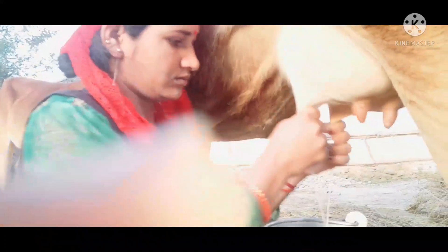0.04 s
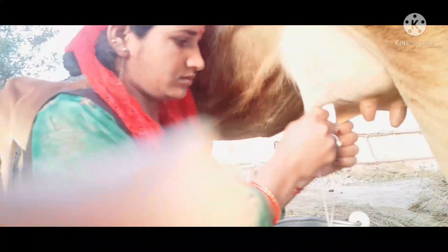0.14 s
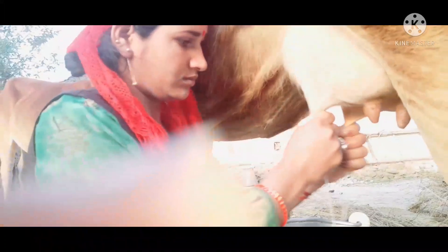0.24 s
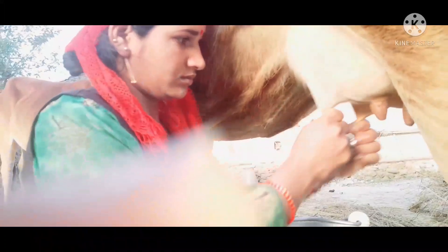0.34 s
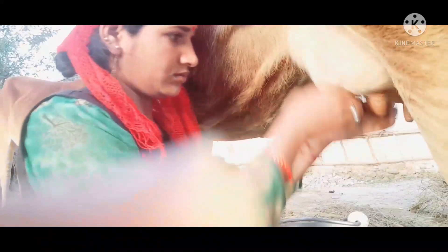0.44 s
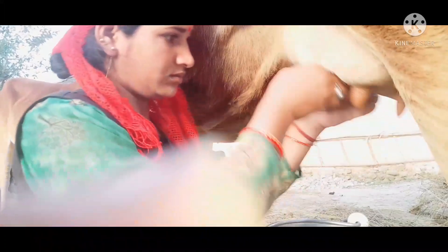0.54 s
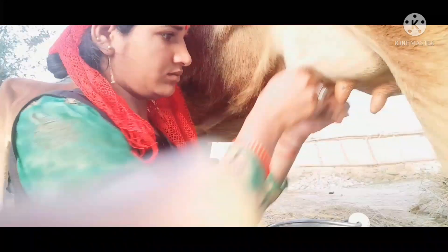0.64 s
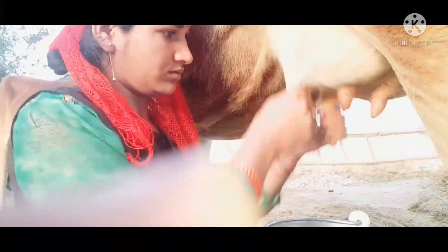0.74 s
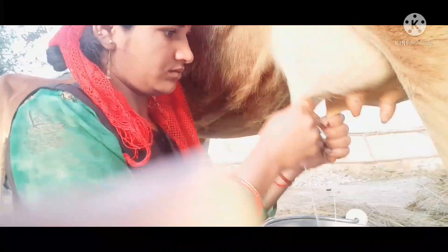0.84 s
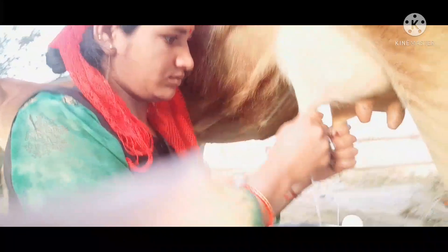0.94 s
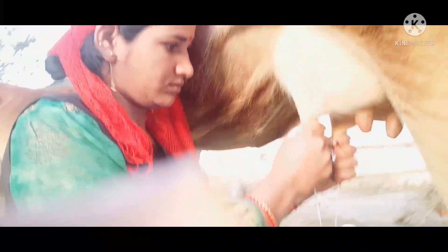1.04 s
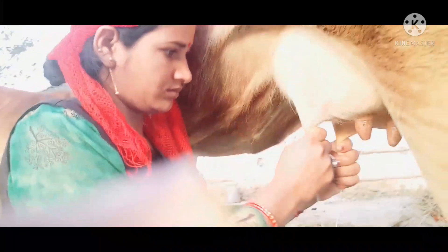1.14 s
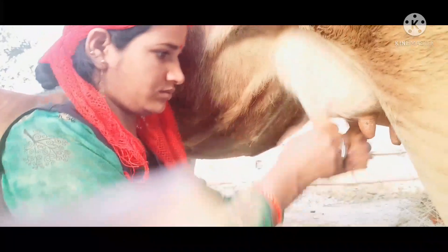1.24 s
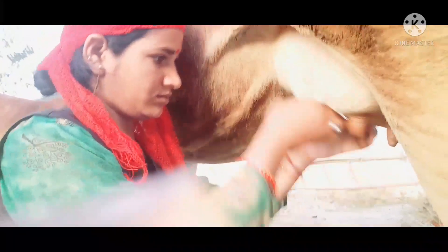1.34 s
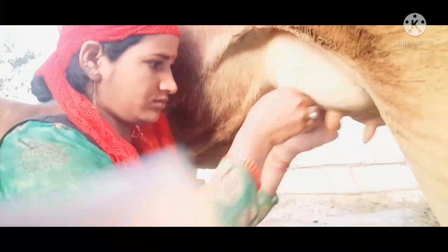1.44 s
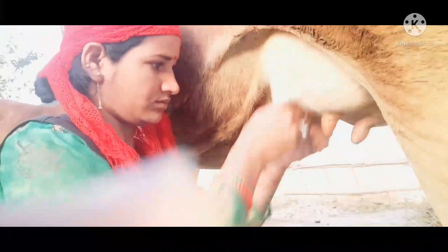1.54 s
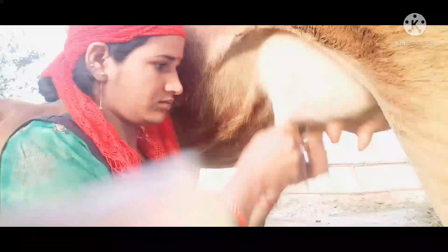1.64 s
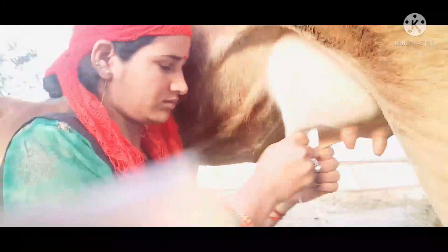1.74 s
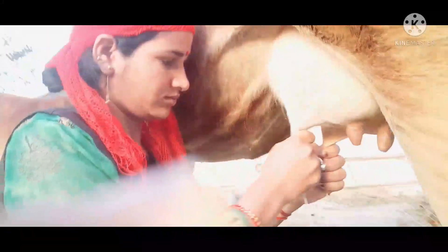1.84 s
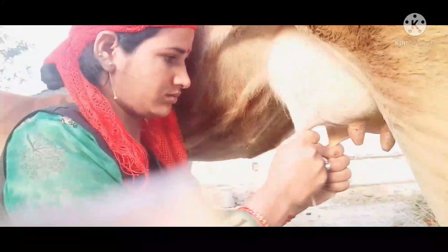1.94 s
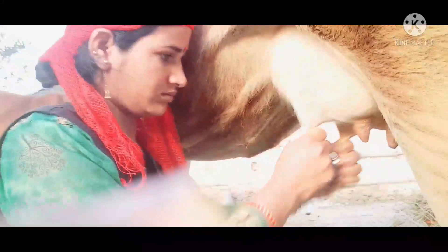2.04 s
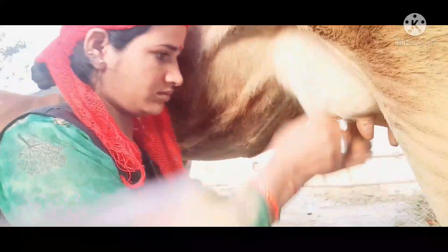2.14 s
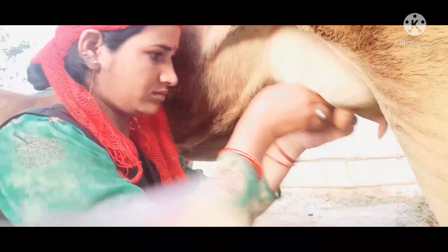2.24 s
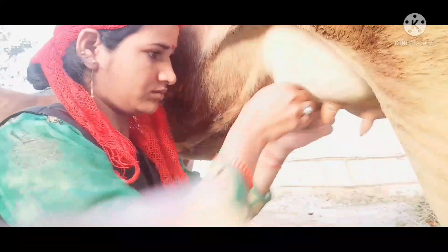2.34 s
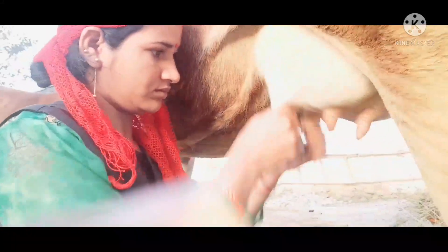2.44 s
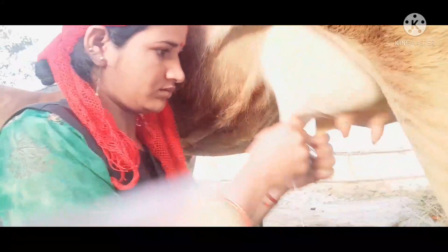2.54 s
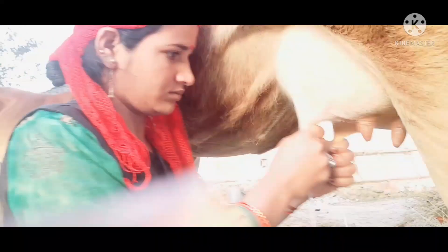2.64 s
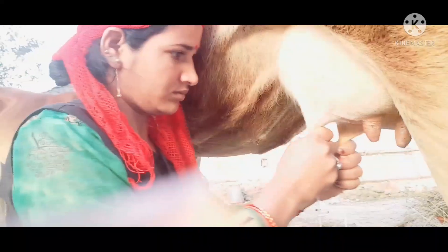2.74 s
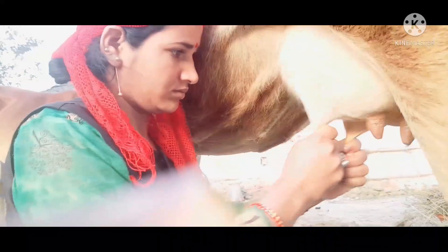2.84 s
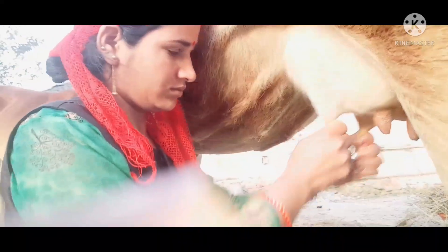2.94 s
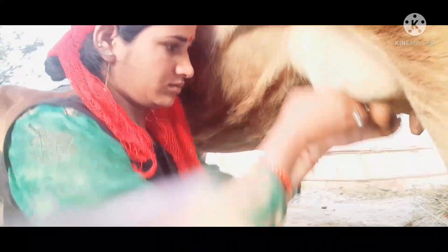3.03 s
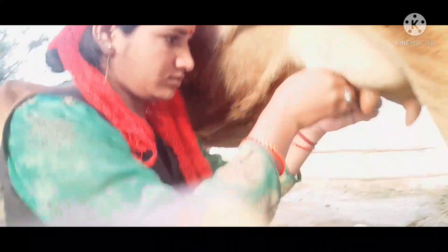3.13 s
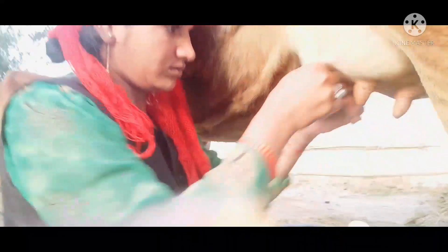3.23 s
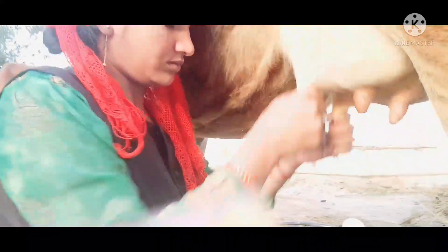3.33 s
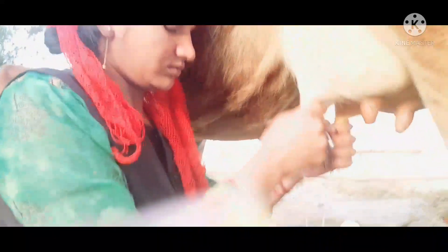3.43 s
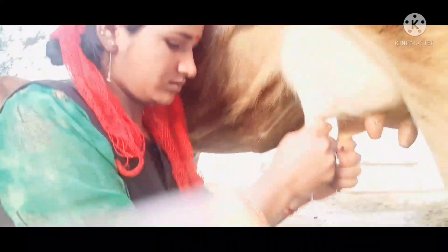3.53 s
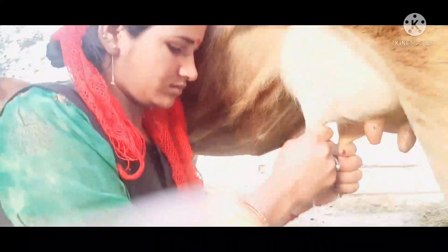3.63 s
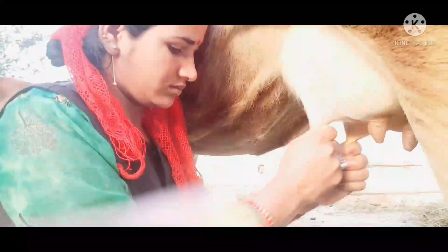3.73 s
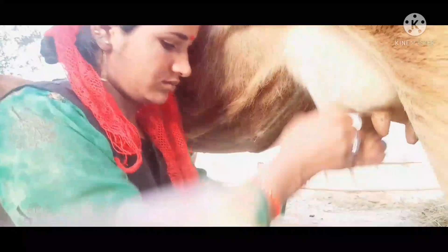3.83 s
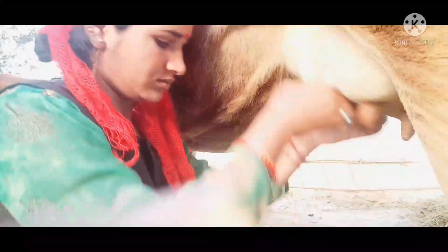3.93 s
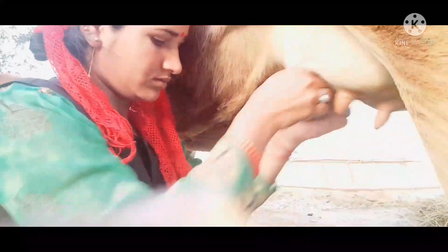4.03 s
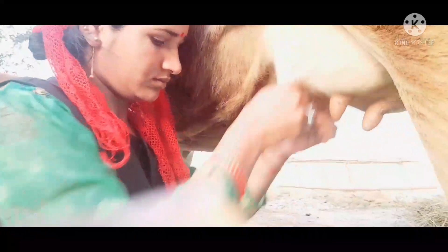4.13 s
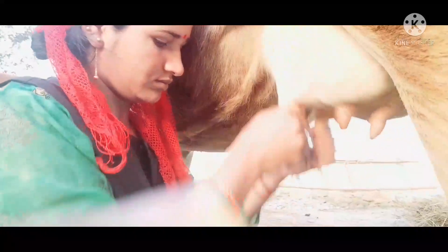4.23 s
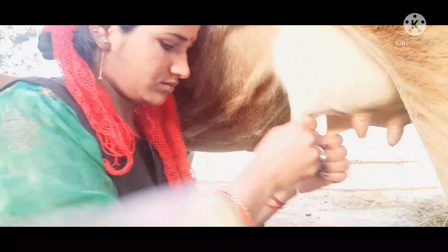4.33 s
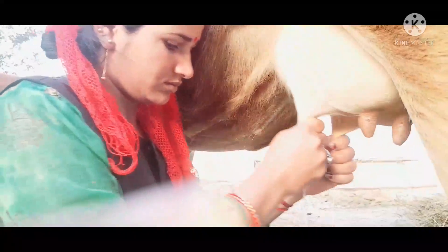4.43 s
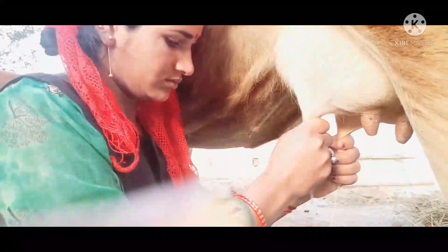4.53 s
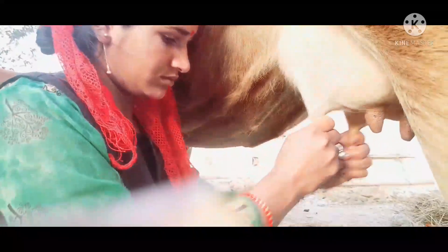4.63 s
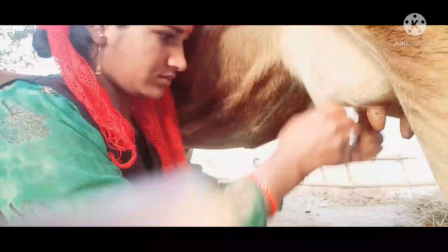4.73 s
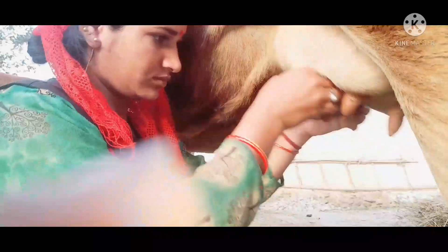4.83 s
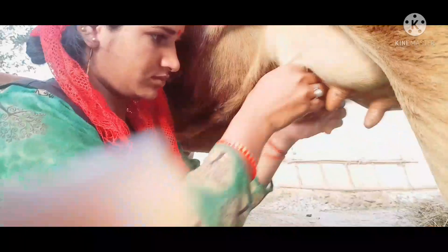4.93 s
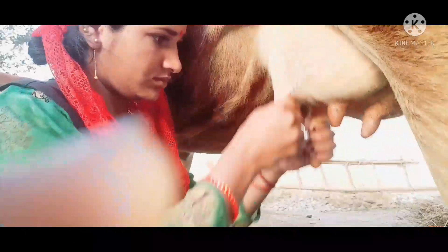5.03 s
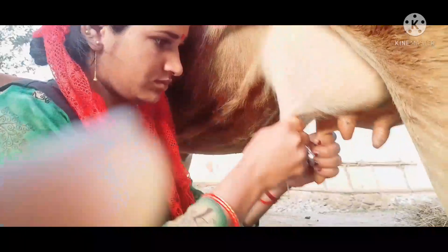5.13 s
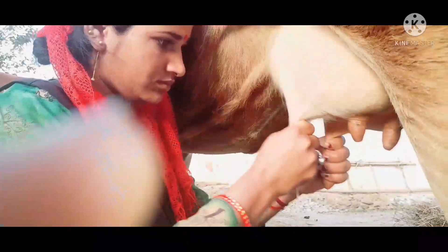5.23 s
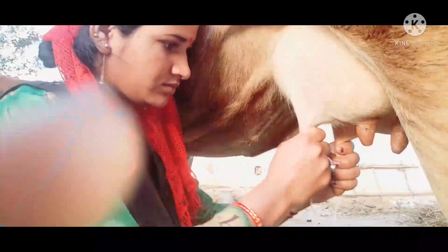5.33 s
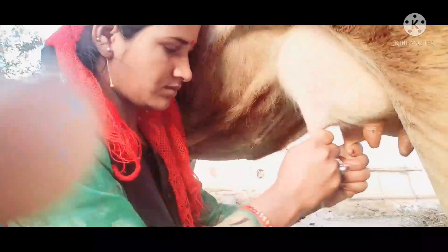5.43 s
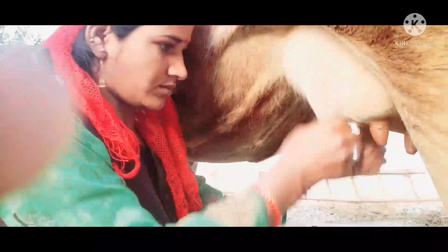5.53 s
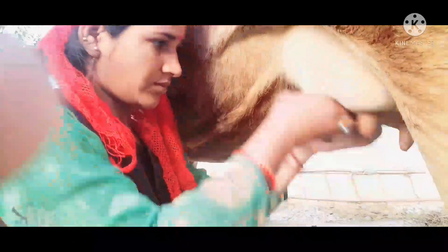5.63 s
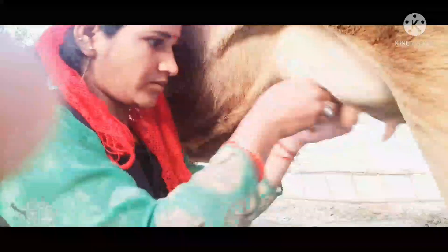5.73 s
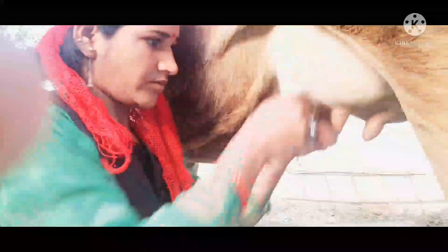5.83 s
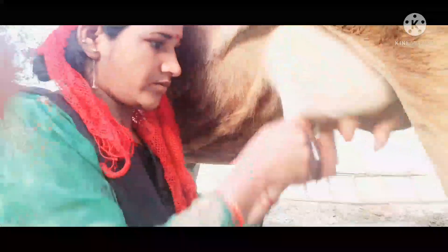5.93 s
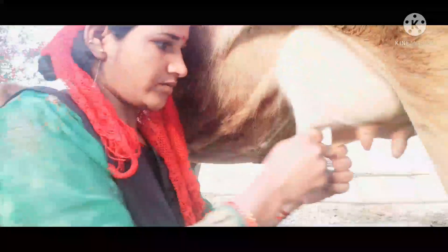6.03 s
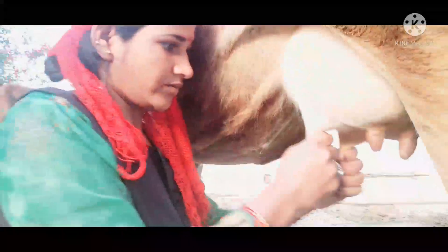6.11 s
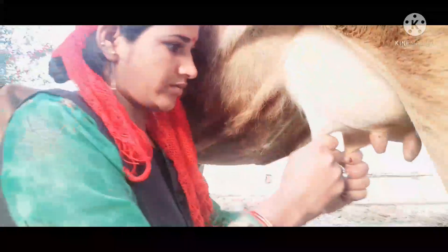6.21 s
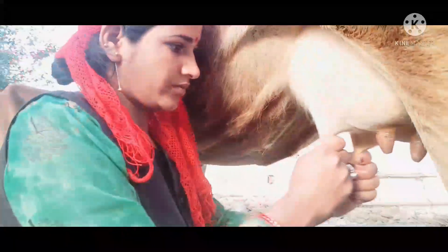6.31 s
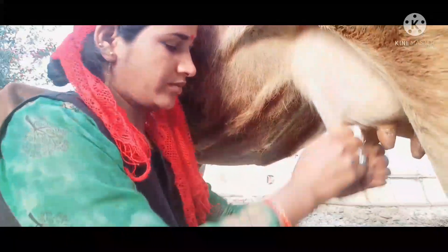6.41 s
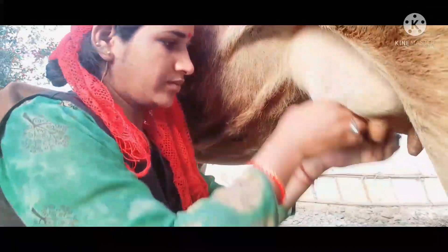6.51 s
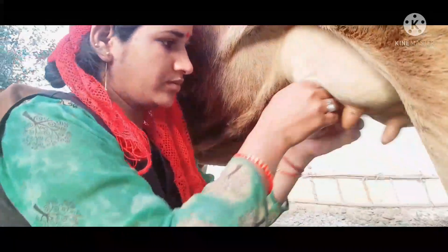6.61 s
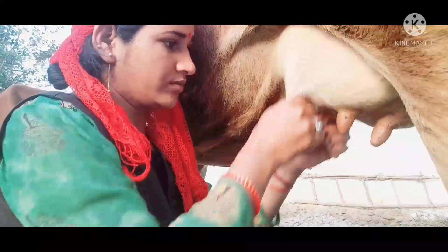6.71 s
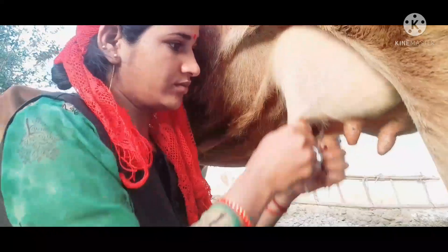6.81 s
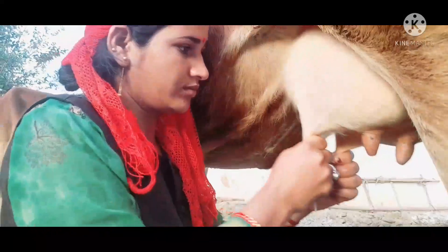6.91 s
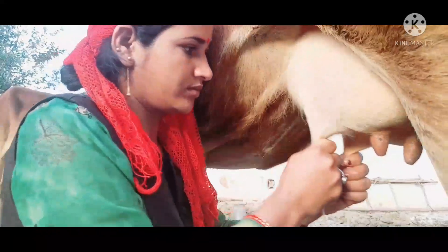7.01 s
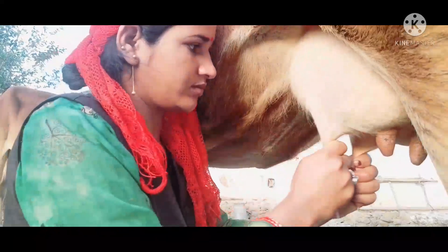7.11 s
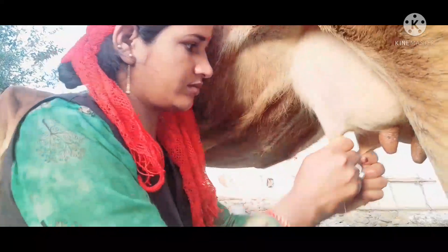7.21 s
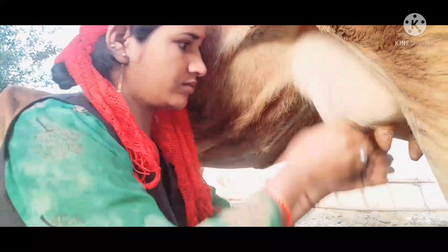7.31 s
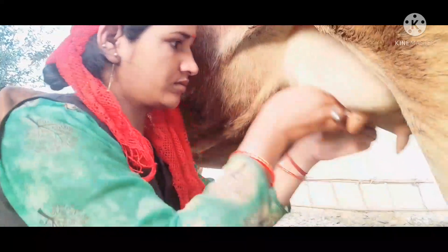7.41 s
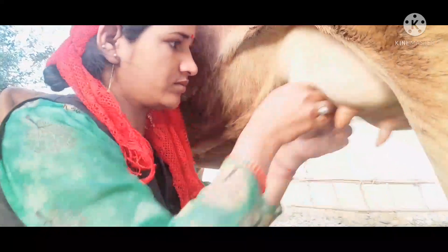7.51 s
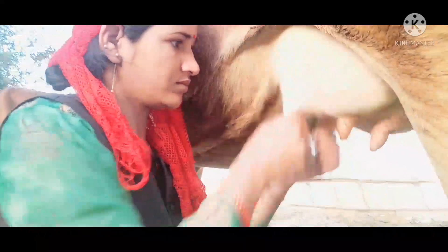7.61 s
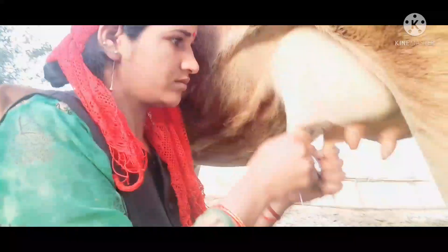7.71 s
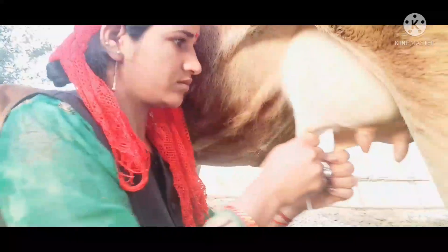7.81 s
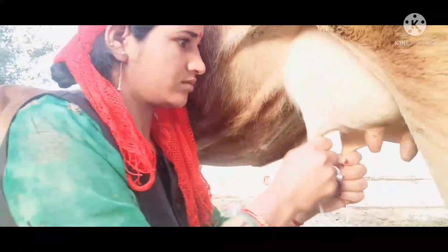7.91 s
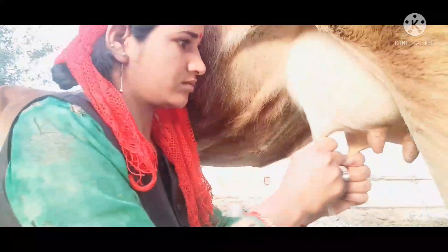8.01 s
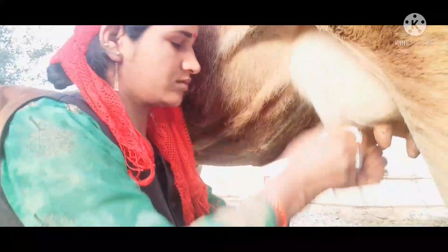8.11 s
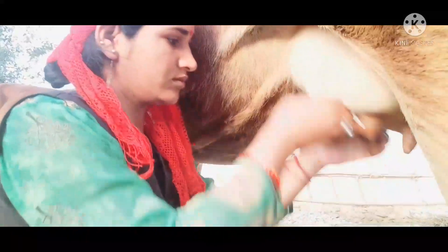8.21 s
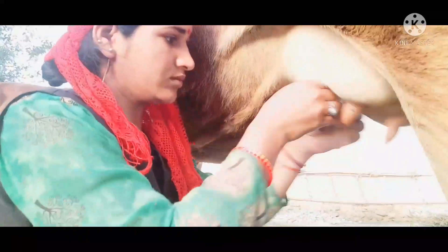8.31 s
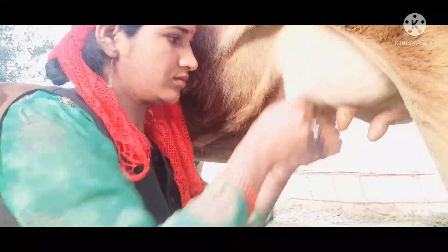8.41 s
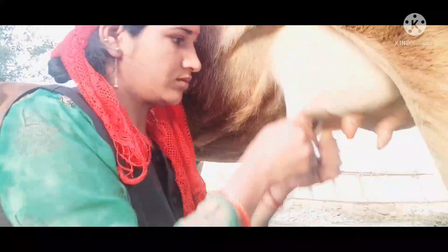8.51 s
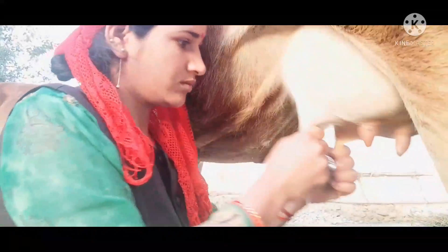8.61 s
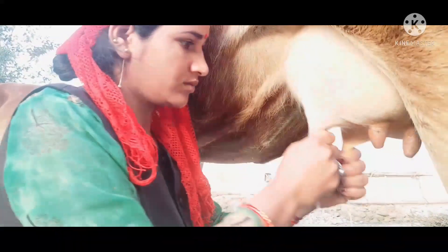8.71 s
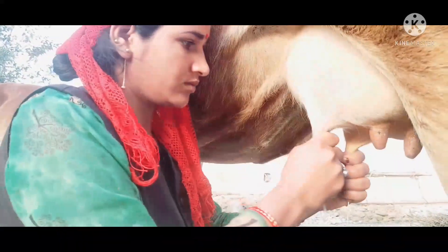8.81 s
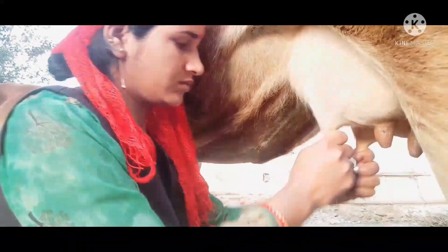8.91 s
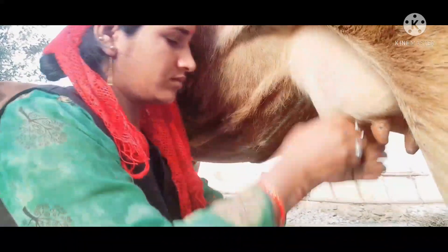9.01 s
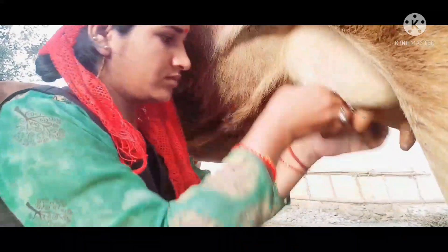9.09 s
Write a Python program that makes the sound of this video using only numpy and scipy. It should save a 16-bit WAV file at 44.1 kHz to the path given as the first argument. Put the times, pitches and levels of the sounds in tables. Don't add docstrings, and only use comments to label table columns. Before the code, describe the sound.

A cow is milked by hand into a metal vessel holding frothy milk, heard at arm's length in a walled yard. Strong squirts begin near 0.0, 0.9, 1.75, 2.6, 3.5, 4.3, 5.2, 6.0, 6.9, 7.8 and 8.65 seconds, each about 0.35 seconds: crisp spray hiss first, then fizzing, popping froth and a hollow low drone as the jet plunges. Sharp droplets crack on metal; drips, thin trickles and dull knocks fill the pauses, with a gulp around 6.6. The cow puffs softly, clearest at 0.9. From 1.4 to 6.5 a bird repeats a fast falling sweep and level whistle every 0.3 seconds; another answers with loud slides around 3.8 to 4.3. Fainter echoing chirps continue, sparse later. Quiet rumbling air and rustling leaves lie underneath, with a breeze bump at 6.3. Handheld stereo microphone, left side shaded.

```python
import sys
import numpy as np
from scipy import signal
from scipy.fft import rfft, irfft, next_fast_len
from scipy.io import wavfile
from scipy.ndimage import uniform_filter1d, map_coordinates

SR = 44100
rng = np.random.default_rng(int(sys.argv[2]) if len(sys.argv) > 2 else 0)


def int16_out(signal):
    q = np.round(np.clip(np.atleast_2d(signal).T, -1, 1) * 32767)
    wavfile.write(sys.argv[1], SR, q.astype(np.int16))


def boost(x):
    u = np.asarray(x, float) / 20
    return 10 ** u


N = 403515
TIME = np.arange(N) / SR


def unit(x):
    return x / np.sqrt(np.mean(x ** 2) + 1e-20)


def along(points, hz):
    f, v = np.transpose(points)
    return np.interp(np.log(hz + 1), np.log(f + 1), v)


def curves(rows):
    s, *cols = np.transpose(rows)
    return [np.interp(TIME, s, c) for c in cols]


def wobble(rate):
    return map_coordinates(rng.standard_normal(int(N * rate / SR) + 4), [TIME * rate])


def swells(rows):
    return sum(boost(2 * db) * np.exp(-2 * ((TIME - s) / length) ** 2) for s, length, db in rows)


def filtered(x, response):
    m = next_fast_len(N + SR // 2)
    return irfft(rfft(x, m) * response(np.fft.rfftfreq(m, 1 / SR)), m)[..., :N]


def band(x, lo_hz, hi_hz):
    return x / np.std(filtered(x, lambda hz: (hz > lo_hz) & (hz < hi_hz)))


def modes(table):
    def response(f):
        total = 0
        for k, (centre, width, db) in enumerate(table):
            damping = 1j * f * width
            total = total + (-1) ** k * boost(db) * damping / (centre * centre - f * f + damping)
        return total
    return response


def pair(alike, patchy_db, size=256):
    z = signal.stft(rng.standard_normal((2, N)), nperseg=size)[2]
    field = uniform_filter1d(rng.standard_normal(z.shape[1:]), size=5, axis=0)
    field = uniform_filter1d(field, size=5, axis=1)
    two = signal.istft(z * boost(patchy_db * unit(field)), nperseg=size)[1][:, :N]
    turn = lambda hz: np.arccos(np.clip(along(alike, hz), -1, 1)) / 2
    mid, side = filtered(two, lambda hz: np.array([np.cos(turn(hz)), np.sin(turn(hz))]))
    return unit(np.array([mid + side, mid - side]))


# f/Hz, level/dB per Hz
AIR_COLOUR = [(15, -41.5), (25, -8.5), (70, 3), (285, 0), (394, -17.5), (900, -17), (1600, -20),
              (2280, -10), (2610, -4.5), (4140, -5.5), (6210, -10), (8590, -15.5), (14000, -12.5),
              (16000, -57)]
# t/s, rumble level/dB, rustle level/dB
BREEZE_LEVELS = [(0, -79, -74), (.65, -76, -76.5), (1.5, -75.5, -74), (2.4, -73, -71.5), (3.2, -72, -72.5),
                 (4.1, -71.5, -68.5), (5, -73.5, -71.5), (5.8, -74, -74), (6.3, -59, -65.5),
                 (6.6, -65.5, -71.5), (7.5, -75.5, -72), (8.4, -77, -71.5), (9.15, -73.5, -66)]
# f/Hz, likeness/1
YARD_ALIKE = [(60, 0.5), (300, 0.7), (700, 0), (1500, 0.19), (15000, 0.28)]


def background():
    rumble_db, rustle_db = curves(BREEZE_LEVELS)
    air = filtered(pair(YARD_ALIKE, patchy_db=1.5), lambda hz: (hz < 14600) * boost(along(AIR_COLOUR, hz)))
    low = filtered(air, lambda hz: 1 / (1 + (hz / 300) ** 4))
    rumble = boost(rumble_db + 1.5 * wobble(6) + 2.5 * wobble(25)) * band(low, 30, 200)
    rustle = boost(rustle_db + 0.56 * wobble(17.0)) * band(air - low, 4150, 5800)
    return rumble + rustle


# f/Hz, 60 dB decay/s
WALL_DECAY = [(1500, 0.24), (3200, 0.39), (7000, 0.42)]


def yard(x, wet_db, gap_s, near_db):
    out, size = np.zeros((2, N + SR)), SR // 3
    for start in range(0, N, size):
        hz, t, z = signal.stft(rng.standard_normal((2, SR // 2)), SR, nperseg=256)
        far_walls = boost(-60 * t / along(WALL_DECAY, hz)[:, None])
        near_walls = boost(near_db - 60 * (t / 0.072) ** 2)
        tail = signal.istft(z * (far_walls + near_walls), SR, nperseg=256)[1]
        tail = np.pad(tail / np.linalg.norm(tail[0]), ((0, 0), (int(gap_s * SR), 0)))
        echo = signal.fftconvolve(x[None, start:start + size], tail, axes=1)
        out[:, start:start + echo.shape[1]] += echo
    return x * boost([[-5], [1.5]]) + boost(wet_db) * out[:, :N]


def sing(track, s, rows, db, factor=1, swell_db=0):
    when, hz, level = np.transpose(rows)
    t = np.arange(int(when[-1] * SR)) / SR
    phase = 2 * np.pi * factor * np.cumsum(np.interp(t, when, hz)) / SR
    edge = np.clip(np.minimum(t, t[-1] - t) / 0.0018, 0, 1)
    level = db + np.interp(t, when, level) + swell_db * (t - t[-1] / 2)
    track[round(s * SR):][:len(t)] += edge * boost(level) * np.sin(phase)


# t/s, length/s, first f/Hz, last f/Hz, level/dB
HIGH_DWELLERS = [
    (.523, 0.047, 2300, 2900, -60),
    (3.1, 0.027, 6500, 4700, -48),
    (3.772, 0.13, 6320, 3710, -32),
    (4.105, 0.04, 2850, 4050, -36.5),
    (4.206, 0.045, 3000, 4150, -37),
    (4.88, 0.07, 3860, 3900, -57),
    (6.488, 0.085, 5380, 4280, -42),
    (6.82, .03, 4200, 3780, -73),
    (4.824, 0.064, 1795, 1585, -64),
    (8.61, 0.015, 5300, 5940, -50),
]
# t/s, length/s, first f/Hz, last f/Hz, level/dB
EVEN_SLIDES = [(.5, 0.047, 4600, 4450, -66), (.73, 0.14, 7500, 7420, -65), (3.052, .03, 6800, 4700, -48.5),
               (3.953, .072, 5950, 2865, -32.5), (4.14, 0.065, 4080, 4000, -40),
               (4.245, 0.02, 4320, 2810, -40), (4.264, 0.049, 2700, 6160, -36.5),
               (4.305, .02, 6240, 4200, -63.5), (4.062, .025, 4900, 3020, -37),
               (4.923, .053, 2040, 2310, -59.5), (6.777, .023, 5100, 4140, -57.5),
               (8.235, .13, 4050, 3600, -52), (8.33, .14, 3700, 3300, -56), (8.44, .16, 3400, 3050, -60.5),
               (6.555, .03, 3120, 3040, -42), (5.912, .03, 3130, 3060, -44), (1.495, .03, 3300, 3200, -42),
               (7.46, .05, 2700, 2720, -64)]
# t/s, length/s, first f/Hz, last f/Hz, level/dB
LOW_DWELLERS = [(.56, 0.07, 2800, 2300, -61), (2.272, 0.021, 3560, 3770, -50),
                (2.427, 0.078, 3510, 3790, -54), (3.098, 0.025, 3600, 3920, -51),
                (4.936, 0.077, 4020, 3270, -49), (5.554, 0.056, 5700, 3740, -47.5),
                (5.7, 0.069, 3870, 4340, -54), (5.81, 0.043, 3960, 3350, -52),
                (5.887, 0.057, 6360, 8050, -57), (6.483, 0.045, 2040, 2550, -54),
                (7.53, 0.13, 2620, 2860, -66), (7.45, 0.23, 6520, 5900, -65),
                (5.05, 0.015, 2240, 2050, -56), (8.553, 0.034, 5030, 4360, -53)]
HIGH_MIDDLE, EVEN_MIDDLE, LOW_MIDDLE = .75, .54, 0.31
FLUTTER_DB = 0


def far_birds():
    beside, far = np.zeros((2, N + SR))
    u = np.linspace(0, 1, num=9)
    for notes, bend in (HIGH_DWELLERS, HIGH_MIDDLE), (EVEN_SLIDES, EVEN_MIDDLE), (LOW_DWELLERS, LOW_MIDDLE):
        for s, length, first, last, db in notes:
            middle = min(first, last) + bend * abs(last - first)
            arc = np.polyval(np.polyfit([0, .5, 1], [first, middle, last], 2), u)
            track = beside if 3.7 < s < 4.4 or 6.4 < s < 6.6 else far
            sing(track, s, np.transpose([u * length, arc, -28 * (u - .55) ** 2]), db)
    flutter = boost(FLUTTER_DB * wobble(60))
    neighbour = yard(flutter * beside[:N], wet_db=-2.5, gap_s=0.0036, near_db=3.0)
    return neighbour + boost(-8) * yard(flutter * far[:N], wet_db=9, gap_s=.002, near_db=-3)


# t/s, f/Hz, level/dB
FALLING_SWEEP = [(0, 6970, 4.5), (.004, 6750, 8.5), (0.02, 5100, 5.5), (0.026, 4012, 9.5),
                 (.037, 2750, 3.5), (.052, 1854, -23)]
# t/s, f/Hz, level/dB
LEVEL_WHISTLE = [(0, 3387, -15.5), (0.029, 3335, -1), (0.056, 3288, -2), (0.08, 3242, 3.5),
                 (0.083, 3146, -8), (.1, 3070, -14.5)]
# t/s, sweep level/dB, wait for the whistle/s, whistle level/dB, pitch factor/1
NEAR_PHRASES = [(1.369, -52, 0.084, -37, 0.98), (1.669, -46, 0.097, -33.5, 1),
                (1.969, -43, 0.086, -33, 0.99), (2.273, -43.5, 0.097, -31.5, 0.98),
                (2.566, -44, 0.092, -33.5, .99), (2.883, -44.5, 0.089, -34.5, 0.99),
                (3.188, -46, 0.09, -38, 0.98), (3.497, -41.5, 0.097, -32.5, 0.96),
                (3.824, -45.5, 0.08, -40.5, 0.96), (4.136, -46, 0.14, -37, .96),
                (4.456, -45.5, 0.094, -33, 0.96), (4.777, -48.5, .097, -42, .97),
                (5.091, -48, 0.11, -35, 0.97), (5.41, -44, 0.092, -35.5, 0.96),
                (5.735, -46, 0.1, -41, 0.97), (6.068, -46, 0.098, -40, 0.96),
                (6.399, -64, 0.084, -44.5, 0.95)]
FULL_VOICE_DB, SWELL_PER_S = -37, 21


def near_bird():
    near = np.zeros(N + SR)
    for s, sweep_db, wait, whistle_db, factor in NEAR_PHRASES:
        sing(near, s, FALLING_SWEEP, sweep_db, factor ** 2)
        swell_db = SWELL_PER_S * (FULL_VOICE_DB - whistle_db)
        sing(near, s + wait, LEVEL_WHISTLE, whistle_db, factor, swell_db)
    return yard(near[:N], wet_db=0.5, gap_s=.001, near_db=1.5)


# f/Hz, likeness/1
CLOSE_ALIKE = [(80, 0.76), (300, 0.94), (500, 0.94), (1200, 0.51), (2000, 0.44), (3000, 0.36), (5000, 0.23),
               (15000, 0.16)]


def close_noise(patchy_db, size=256):
    return pair(CLOSE_ALIKE, patchy_db, size)


# f/Hz, width/Hz, level/dB
NASAL_MODES = [(710, 470, 5), (1280, 250, 6.5)]
# t/s, length/s, level/dB
NOSE_PUFFS = [
    (.93, 0.085, -48.5),
    (1.38, .12, -61.5),
    (2.3, 0.035, -64.5),
    (3.22, 0.046, -62),
    (4.15, 0.051, -60.5),
    (5.97, 0.13, -65.5),
    (6.83, 0.096, -65.5),
    (7.68, 0.095, -69),
]
DULLING = 0.84


def cow():
    effort = np.sqrt(swells(NOSE_PUFFS))
    low, high = (boost(mode[2]) * unit(filtered(close_noise(patchy_db=2.0), lambda hz: modes([mode])(hz) ** 2))
                 for mode in NASAL_MODES)
    return boost(-8.5) * effort * (low + (effort / effort.max()) ** DULLING * high)


def bubbles(s, hz, size, cycles, rise, spread_s, length):
    delay = spread_s * (3 + np.clip(rng.standard_normal((len(s), 2)), -3, 3).T[..., None])
    t = np.arange(length) / SR - delay
    turns = np.maximum(t, 0) * hz[:, None]
    life = turns / cycles
    envelope = size[:, None] * np.exp(-3 * life) * (1 - np.exp(-3 * turns))
    ring = envelope * np.sin(2 * np.pi * turns * (1 + rise * life))
    at = (np.round(s * SR).astype(int)[:, None] + np.arange(length)).ravel()
    return np.array([np.bincount(at, port.ravel(), N + length)[:N] for port in ring])


# f/Hz, level/dB per Hz
SPRAY_COLOUR = [(1760, -27.5), (3000, -7.5), (3700, -4), (5330, -10), (7200, -7), (13800, -10),
                (15000, -9.5), (16000, -31.5)]


def spray_colour(hz):
    return boost(along(SPRAY_COLOUR, hz))


# t/s, peak level/dB, f/Hz
DULL_KNOCKS = [(0.509, -66, 186), (0.652, -83, 217.6), (0.709, -64, 139), (1.351, -49, 197),
               (2.623, -51, 207), (3.199, -57, 180), (3.868, -48, 225), (4.743, -43, 144),
               (5.025, -52, 780), (6.51, -42, 390), (6.76, -56, 316), (7.278, -58, 414), (7.412, -48, 350),
               (7.789, -50, 177), (8.373, -60, 786)]
# t/s, peak level/dB, f/Hz
LONE_DRIPS = [
    (.658, -64, 1500),
    (2.191, -49.5, 3000),
    (3.181, -54.5, 2200),
    (6.654, -47, 2800),
    (6.757, -61, 900),
    (6.757, -61, 4500),
    (6.788, -58, 3500),
    (8.19, -41, 2500),
    (8.38, -55, 1300),
    (3.775, -40, 4500),
]
# t/s, peak level/dB
WALL_DROPLETS = [(.0174, -44.5), (.0533, -35.5), (0.3264, -30.5), (.658, -52), (1.2542, -33),
                 (2.6229, -36.5), (4.3011, -41), (4.356, -23.5), (4.4054, -29.5), (5.201, -43.5),
                 (6.0466, -35), (7, -27), (7.1601, -26), (0.9174, -23), (0.989, -25.5), (1.7662, -35),
                 (1.7968, -26.5), (2.0147, -21.5), (2.6528, -27), (2.708, -26), (2.991, -32.5),
                 (3.4855, -33.5), (3.5922, -20), (4.5253, -31), (5.4897, -15), (5.9364, -46), (6.3818, -22),
                 (6.9215, -25), (7.7622, -40), (7.809, -28.5), (8.645, -29.5), (8.6624, -24.5),
                 (8.7844, -29)]
# t/s, peak level/dB, f/Hz
LARGE_BUBBLES = [(0.0843, -30, 2390), (0.4206, -32, 2630), (0.9102, -30.5, 2580), (1.04, -21, 2680),
                 (1.192, -26, 2650), (1.791, -24.5, 2130), (1.8363, -14.5, 2480), (1.8467, -17, 1840),
                 (2.127, -29.5, 2890), (2.794, -22.5, 2600), (3.462, -38, 2130), (3.484, -32, 2910),
                 (3.516, -20, 2660), (3.7297, -27, 1230), (3.791, -23.5, 1280), (4.468, -22, 2720),
                 (4.7464, -37, 2480), (5.283, -22, 2600), (6.0995, -24.5, 3190), (6.2163, -24.5, 1700),
                 (6.38, -30, 2600), (1.081, -25.5, 1400), (2.879, -28.5, 1380), (6.9571, -25.5, 2040),
                 (7.809, -28, 2790), (7.8305, -31, 2920), (8.1589, -46.5, 1280), (8.1836, -46, 2280),
                 (8.675, -31, 2340), (8.7134, -22.5, 2550), (9.0217, -39, 2470)]


def splashes():
    s, db, hz = np.transpose(LARGE_BUBBLES)
    pops = bubbles(s, hz, boost(db + 0.5), cycles=25.7, rise=0.054, spread_s=.00004, length=800)
    s, db, hz = np.transpose(DULL_KNOCKS)
    thuds = bubbles(s, hz, boost(db - 2.5), cycles=11.8, rise=-.05, spread_s=.00002, length=6000)
    s, db, hz = np.transpose(LONE_DRIPS)
    drips = bubbles(s, hz, boost(db + 8), cycles=3.5, rise=.03, spread_s=.00003, length=400)
    cracks, t = np.zeros((2, N + SR)), np.arange(600) / SR
    for s, db in WALL_DROPLETS:
        decay = boost(db - 0.5 - 60 * t / 0.021)
        cracks[:, round(s * SR):][:, :len(t)] += decay * rng.standard_normal((2, len(t)))
    return pops + thuds + drips + boost(7.0) * filtered(cracks[:, :N], spray_colour)


# t/s, length/s, f/Hz, level/dB
FROTH_PITS = [(.2, 0.063, 2400, -38.5), (0.269, .06, 790, -40), (0.974, .025, 2520, -38),
              (1.075, .03, 1400, -39.5), (1.131, .04, 2400, -42.5), (1.844, 0.01, 2110, -30.5),
              (1.885, 0.016, 2600, -35), (1.978, .03, 2600, -38), (2.76, .04, 2460, -39),
              (2.879, 0.028, 1110, -38.5), (3.526, .02, 2770, -32.5), (3.623, .03, 2400, -38),
              (4.401, 0.033, 2170, -36.5), (4.51, .04, 2420, -40.5), (5.286, .015, 2600, -35.5),
              (5.38, .04, 3900, -38.5), (5.474, 0.016, 1190, -42), (6.091, 0.026, 2600, -36.5),
              (6.14, .02, 4000, -37.5), (6.184, 0.048, 1410, -35), (6.242, .008, 3070, -32),
              (6.293, 0.0072, 2820, -32), (6.976, .025, 2120, -38.5), (7.071, 0.033, 3560, -38.5),
              (7.201, .03, 2800, -43), (7.915, .02, 3500, -38), (8.006, .04, 2800, -43),
              (8.692, .04, 1400, -50), (8.726, .015, 2490, -33), (8.823, .03, 2900, -37.5)]
PIT_SHARPNESS, PIT_ROUGH_DB = 4.0, 2


def pits():
    out, drive = np.zeros((2, N)), boost(PIT_ROUGH_DB * wobble(250)) * close_noise(patchy_db=2.0)
    hz = np.fft.rfftfreq(8192, 1 / SR)
    for s, length, pitch_hz, db in FROTH_PITS:
        part = slice(round(s * SR) - 4096, round(s * SR) + 4096)
        cavity = modes([(pitch_hz, pitch_hz / PIT_SHARPNESS, 0)])(hz) ** 2
        ring = unit(irfft(rfft(drive[:, part]) * cavity))
        out[:, part] += boost(db) * np.exp(-((TIME[part] - s) / length) ** 2) * ring
    return out


# t/s, level over the flow/dB
JET_SPURTS = [(.12, 4.5), (.21, 5), (.9652, 4.5), (1.0111, 2.5), (1.041, 8), (1.08, 5.5), (1.1348, 6.5),
              (1.189, 12.5), (1.2555, 6.5), (1.789, 5.5), (1.84, 5), (1.8817, 9), (1.94, 0), (2.08, -1.5),
              (2.6917, 5), (2.791, 2), (2.855, 3.5), (2.878, 12.5), (2.905, 8), (3.484, 7), (3.517, 13),
              (3.59, -2), (3.631, 5), (3.7178, 2), (3.783, 5.5), (4.37, 10), (4.3962, 3), (4.468, 5),
              (4.5067, 3), (4.6453, 12), (5.283, 6.5), (5.378, 3), (5.43, 0), (5.475, 5.5), (6.071, 10.5),
              (6.099, 7.5), (6.156, 7.5), (6.2165, 9), (6.241, 5), (6.291, 7.5), (6.956, 7), (6.986, 3),
              (7.061, 2), (7.16, 3), (7.196, 7), (7.1, 4), (7.83, 4.5), (7.861, 3.5), (7.895, -3),
              (7.915, 2), (8.645, 6.5), (8.675, 8), (8.711, 6), (8.723, 9), (8.7843, 5.5), (8.816, 8),
              (8.9984, 4)]
SURGE_S, EBB_S = .0015, .006
LULL_DB = -2


def surges():
    total = np.full(N + SR, float(LULL_DB))
    t = np.arange(-400, 2600) / SR
    shape = np.where(t < 0, np.exp(-(t / SURGE_S) ** 2), np.exp(-np.abs(t) / EBB_S))
    for s, db in JET_SPURTS:
        total[round(s * SR) - 300:][:len(t)] += db * shape
    return total[:N]


# t/s, length/s, spray level/dB, wait until the jet pierces the froth/s, plunge depth/dB
SQUEEZES = [(0.044, 0.37, -36, 0.16, 3), (0.897, 0.36, -36, 0.079, 4), (1.755, 0.34, -35.5, 0.085, 2),
            (2.63, 0.33, -35, 0.11, 3.5), (3.463, 0.35, -36, 0.071, 3.5), (4.306, 0.39, -35.5, 0.14, 3.5),
            (5.218, 0.33, -34.5, 0.064, 1), (6.034, 0.39, -36.5, 0.12, 3.5), (6.9, .37, -33, 0.12, -1),
            (7.79, 0.33, -38, 0.092, -1.5), (8.649, 0.36, -36, 0.088, -1.5)]
# t/s, length/s, level/dB
THIN_TRICKLES = [
    (1.28, 0.013, -60),
    (2.596, 0.02, -58),
    (3.08, 0.045, -60),
    (3.87, 0.055, -55),
    (4.14, 0.13, -61.5),
    (5.975, 0.16, -68.5),
    (7.36, 0.022, -77),
    (8.16, 0.032, -67),
    (8.477, 0.12, -59),
    (9.105, 0.087, -59),
]
# t/s, level over the plunge/dB
AIR_GULPS = [(.24, 4), (.3, 1.5), (0.428, 10.5), (1.15, 3), (2.04, 4.5), (2.879, 3), (4.58, 2.5), (4.69, 4),
             (5.48, 5.5), (6.23, 4.5), (6.36, 3), (6.6, 13.5), (7.1, 3), (8.06, 9.5), (8.97, 4.5)]
GULP_S = 0.039
OPEN_S, SWELL_S, TAPER_S, CLOSE_S, DRAIN_S = 0.067, 0.1, 0.093, 0.079, .15
SHUT_DB, THIN_DB, CREST_DB, SAG_DB, BREAK_DB, DRAIN_DB = -45, -13.5, 0.5, -1, -11.5, -34
CREST_SHARE = 0.59
PIERCE_S, SKIM_DB, DEEP_DB, SETTLE_DB = 0.032, -27.5, -4.5, -5
SLOSH_DB, STILL_DB = -2, -10
WHIP_SHARE = 0.85
CALM_DB, WHIPPED_DB, SPENT_DB = -7.5, 0.5, -4
FROTH_FOLLOWS = 0.72
GURGLE_DB, GURGLE_RATE = 1.5, 25
TRICKLE_SKIMS = 0.46
SEEP_DB, FOAMED_DB, FOAM_S = -82, -73.5, 2.3


def jet():
    flow = boost(2 * np.interp(TIME, [0, FOAM_S], [SEEP_DB, FOAMED_DB]))
    froth, plunge = [], []
    for s, length, db, wait, depth_db in SQUEEZES:
        end = s + length
        shut, drained = end + CLOSE_S, end + CLOSE_S + DRAIN_S
        stages = [s - OPEN_S, s, s + SWELL_S, s + CREST_SHARE * length, end - TAPER_S, end, shut, drained]
        levels = [SHUT_DB, THIN_DB, 0, CREST_DB, SAG_DB, BREAK_DB, DRAIN_DB, SHUT_DB]
        flow = flow + boost(2 * (db + np.interp(TIME, stages, levels, left=-99, right=-99)))
        follow_db = FROTH_FOLLOWS * depth_db
        froth += [(s, CALM_DB), (s + WHIP_SHARE * wait, WHIPPED_DB + follow_db),
                  (shut, SPENT_DB + follow_db), (drained, STILL_DB)]
        plunge += [(s - OPEN_S, STILL_DB), (s, SKIM_DB), (s + wait - PIERCE_S, SKIM_DB),
                   (s + wait + PIERCE_S, DEEP_DB + depth_db), (end - TAPER_S, SETTLE_DB + depth_db),
                   (end + CLOSE_S / 2, SLOSH_DB), (drained, STILL_DB)]
    gulp_db = sum(db * np.exp(-((TIME - s) / GULP_S) ** 2) for s, db in AIR_GULPS)
    skim_db = 10 * np.log10(1 + swells(THIN_TRICKLES) / flow)
    spray_db = 10 * np.log10(flow) + skim_db
    froth_db, plunge_db = (curves(rows)[0] + GURGLE_DB * wobble(GURGLE_RATE) - TRICKLE_SKIMS * skim_db
                           for rows in (froth, plunge))
    return spray_db, froth_db, plunge_db + gulp_db


# f/Hz, width/Hz, level/dB
WALL_MODES = [(822, 20, 10), (1120, 28, 6), (1362, 76, 3), (1936, 53, -2), (2600, 290, -5.5),
              (4500, 77, -1.5), (6300, 93, -11)]


def wall(hz):
    return 1 + np.abs(modes(WALL_MODES)(hz))


def swarm(count, centre_hz, octaves, scatter_db, **shape):
    draw = rng.random((count, 2))
    hz = centre_hz * 2 ** (octaves * np.clip(rng.standard_normal(count), -2, 2))
    size = boost(-scatter_db * np.log(1.01 - draw[:, 1]))
    return bubbles(draw[:, 0] * N / SR, hz, size, **shape)


# f/Hz, width/Hz, level/dB
AIR_MODES = [(200, 304, -16), (351.7, 56, 0), (532, 82, 0), (753, 177, -2), (1091, 26, -1.5)]


def hollow(sputter):
    glugs = swarm(count=1500, centre_hz=517.8, octaves=0.481, scatter_db=4.0,
                  cycles=18.3, rise=0.059, spread_s=.00002, length=1400)
    drive = boost(-13.5) * unit(glugs) + close_noise(patchy_db=4.5, size=1024)
    return band(filtered(boost(1.23 * sputter) * drive, modes(AIR_MODES)), 280, 800)


# f/Hz, level/dB
FROTH_COLOUR = [(500, -24.5), (900, -10), (1400, -4.5), (2100, -1.5), (2750, 1.5), (3800, -4.5), (5000, -6),
                (6500, -35.5)]


def bubbling(sputter, fine_db):
    fizz = swarm(count=9000, centre_hz=2300, octaves=0.732, scatter_db=2.5,
                 cycles=18.8, rise=0.076, spread_s=.00005, length=256)
    churn = boost(9.0) * close_noise(patchy_db=2.5, size=512)
    uneven = boost(1.0 * sputter + 1.5 * wobble(140))
    froth = filtered(uneven * (unit(fizz) + churn), lambda hz: wall(hz) * boost(along(FROTH_COLOUR, hz)))
    froth = band(froth, 1000, 2400)
    coarse = filtered(froth, lambda hz: 1 / (1 + (hz / 2400) ** 6))
    return coarse + boost(fine_db) * (froth - coarse)


def spray(sputter):
    spits = boost(.8 * sputter + 2.36 * wobble(220) + 1.4 * wobble(900))
    hiss = filtered(spits * close_noise(patchy_db=3.0, size=512), lambda hz: wall(hz) * spray_colour(hz))
    return band(hiss, 7500, 15500)


SPRAY_FOLLOWS, PLUNGE_FOLLOWS = 0.53, 0.69


def milk():
    spray_db, froth_db, plunge_db = jet()
    surge_db = surges()
    sputter = wobble(45)
    fine_db = -1.5 - 0.22 * plunge_db
    hiss = boost(SPRAY_FOLLOWS * surge_db) * spray(sputter)
    froth = boost(froth_db + surge_db - 3.0) * bubbling(sputter, fine_db)
    plunge = boost(plunge_db + PLUNGE_FOLLOWS * surge_db) * hollow(sputter)
    return boost(spray_db) * (hiss + froth + plunge)


def scene():
    return background() + far_birds() + near_bird() + cow() + splashes() + pits() + milk()


def top_cut(x):
    return signal.sosfilt(signal.butter(12, 15830, fs=SR, output="sos"), x)


# f/Hz, left minus right level/dB
HAND_SHADE = [(60, -4), (130, -2), (290, -0.5), (640, -2), (1410, -7), (3100, -9), (6820, 3), (15000, -6.5)]
# f/Hz, phase/rad
LEFT_LAG = [(100, 0.091), (300, 0.09), (500, 0.64), (700, 0.84), (1300, 1.19), (3000, 1.16), (15000, 2.1)]


def record(dry):
    half = np.array([[.5], [-.5]])
    capsule = lambda hz: (hz < 15750) * hz ** 2 / (hz ** 2 + 30 ** 2)
    shade = lambda hz: boost(half * along(HAND_SHADE, hz))
    lag = lambda hz: np.exp(-1j * half * along(LEFT_LAG, hz))
    ports = filtered(dry, lambda hz: capsule(hz) * shade(hz) * lag(hz))
    return top_cut(ports)


dry = scene()
out = record(dry)
int16_out(out)
```